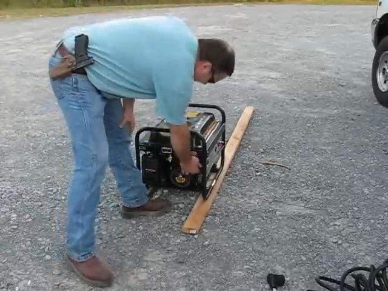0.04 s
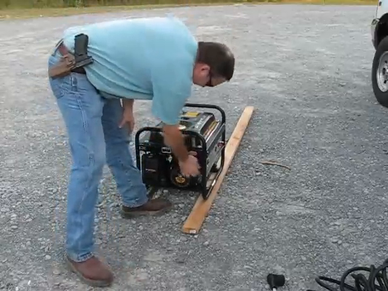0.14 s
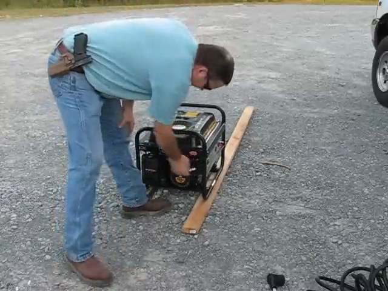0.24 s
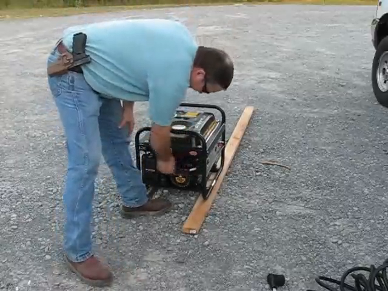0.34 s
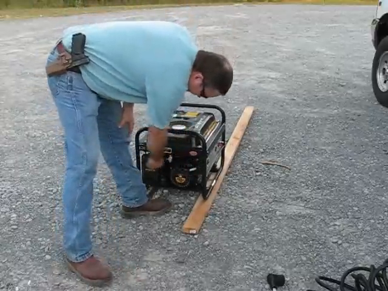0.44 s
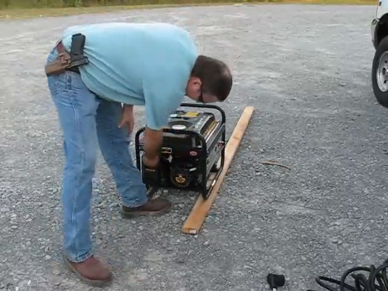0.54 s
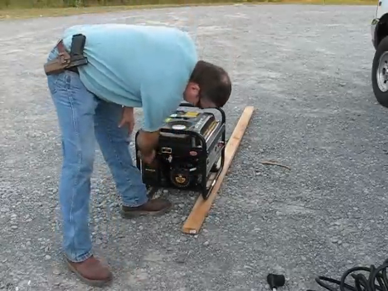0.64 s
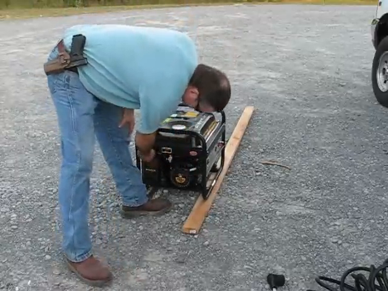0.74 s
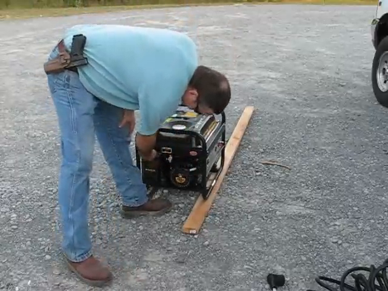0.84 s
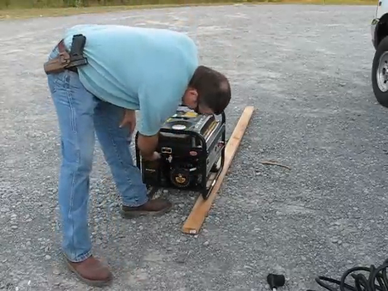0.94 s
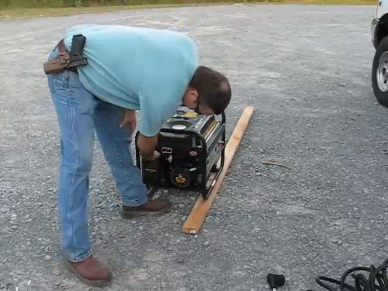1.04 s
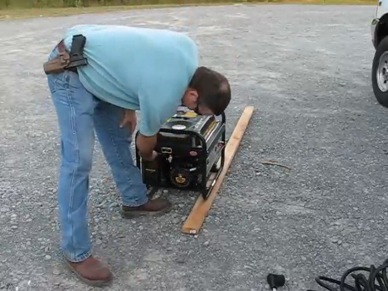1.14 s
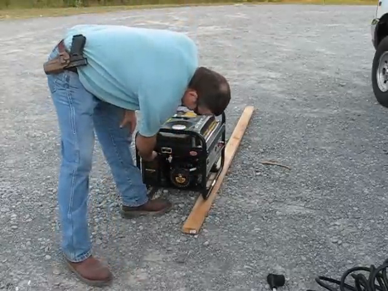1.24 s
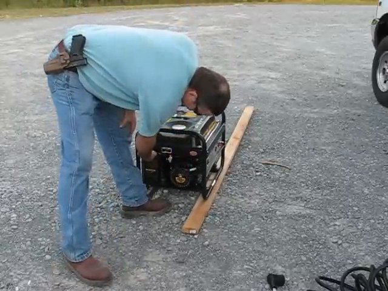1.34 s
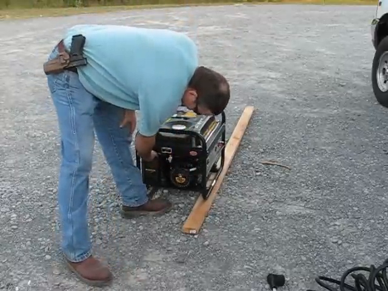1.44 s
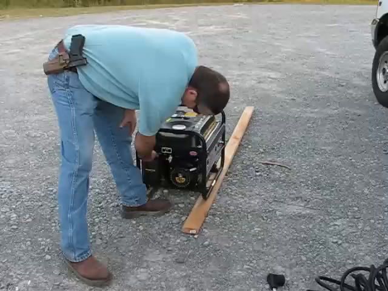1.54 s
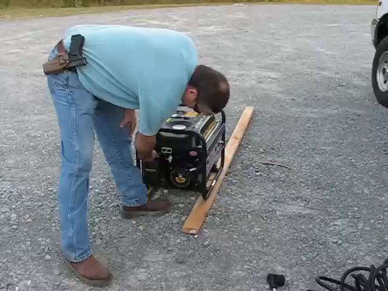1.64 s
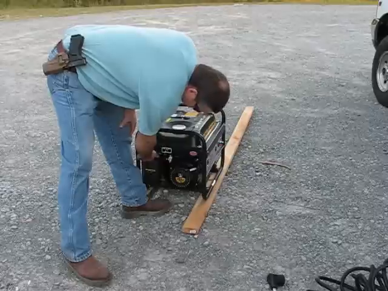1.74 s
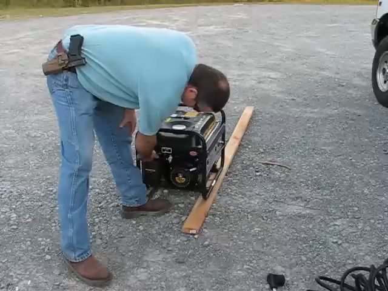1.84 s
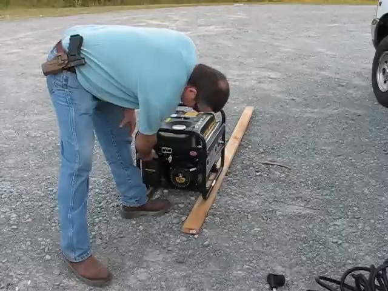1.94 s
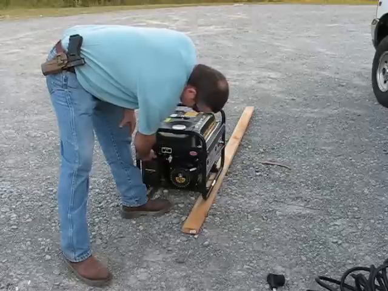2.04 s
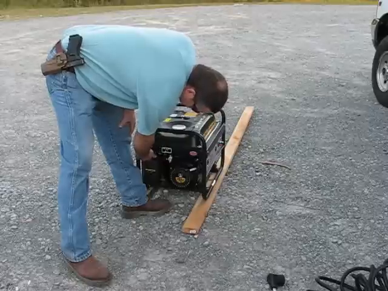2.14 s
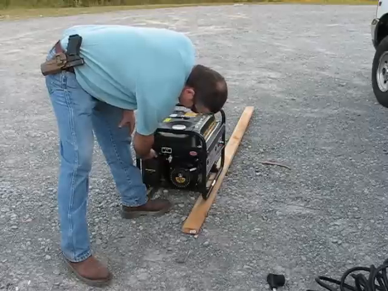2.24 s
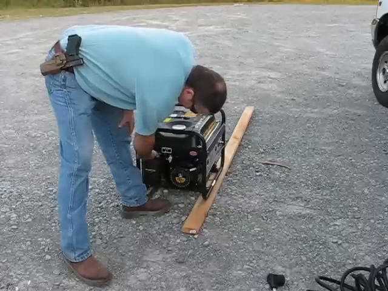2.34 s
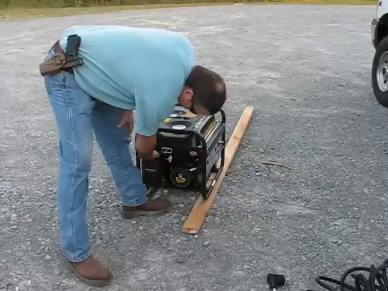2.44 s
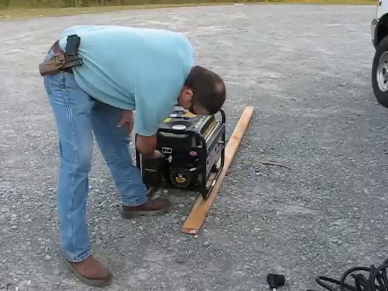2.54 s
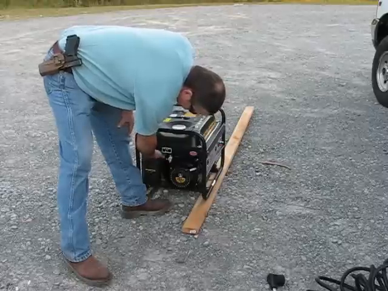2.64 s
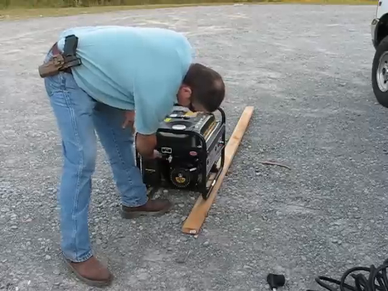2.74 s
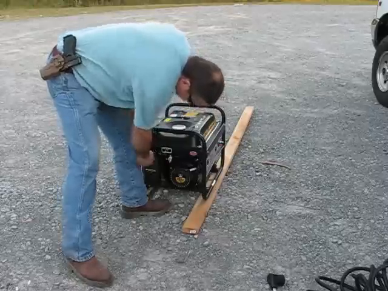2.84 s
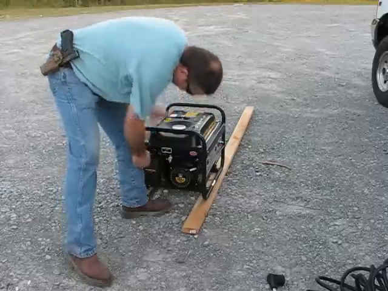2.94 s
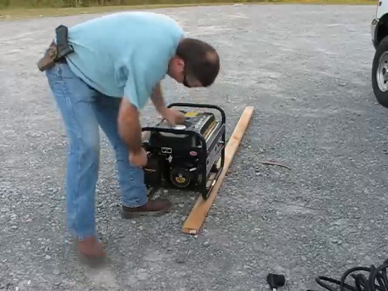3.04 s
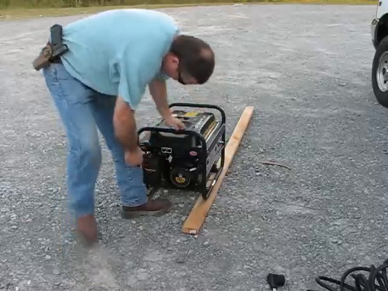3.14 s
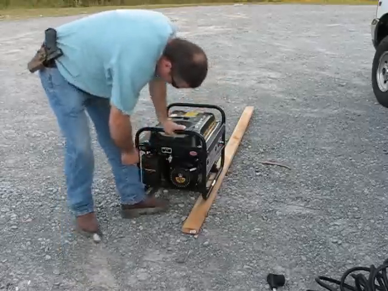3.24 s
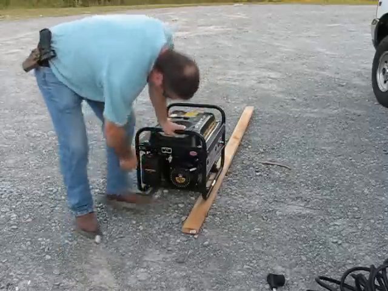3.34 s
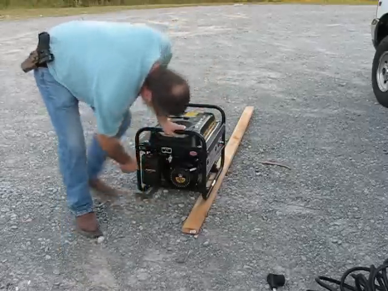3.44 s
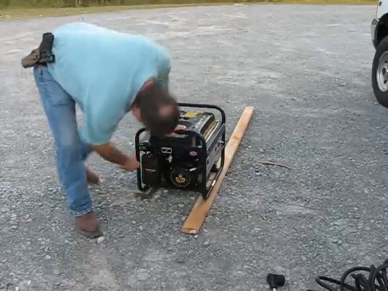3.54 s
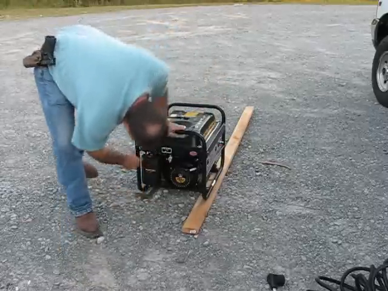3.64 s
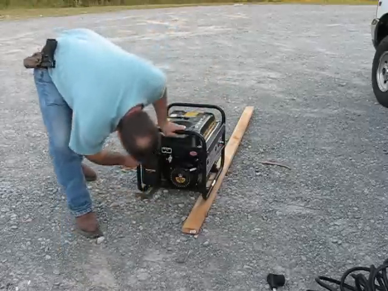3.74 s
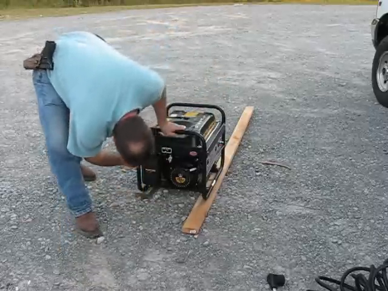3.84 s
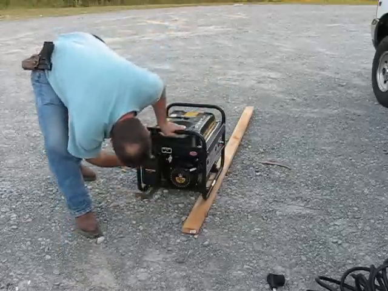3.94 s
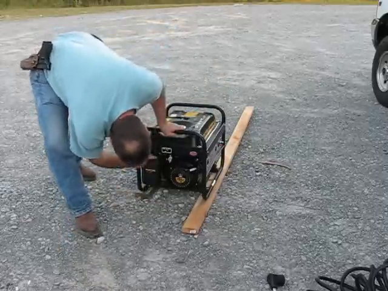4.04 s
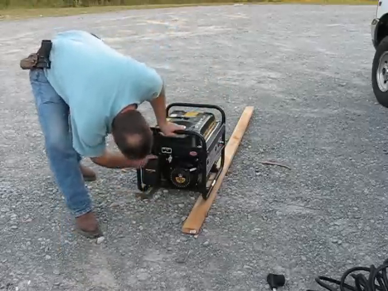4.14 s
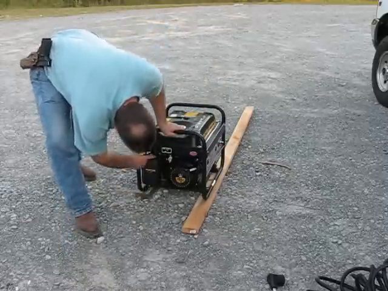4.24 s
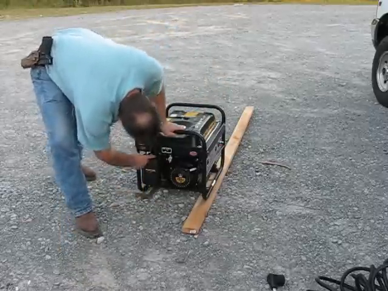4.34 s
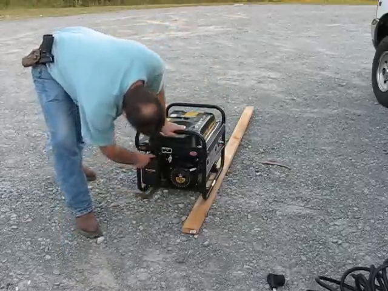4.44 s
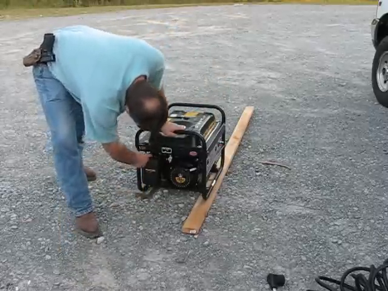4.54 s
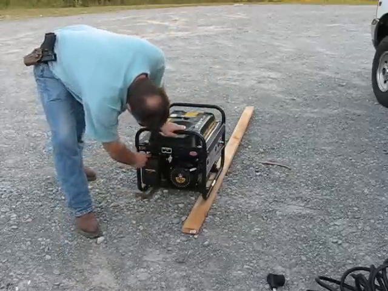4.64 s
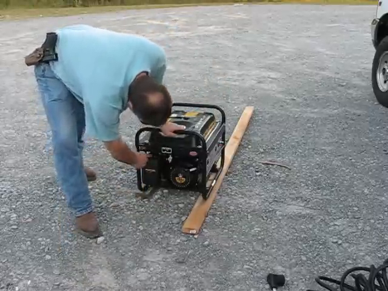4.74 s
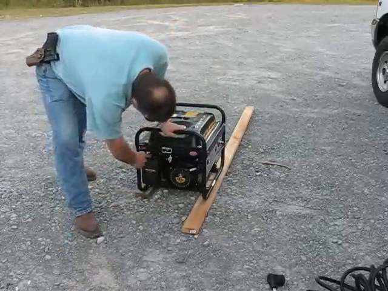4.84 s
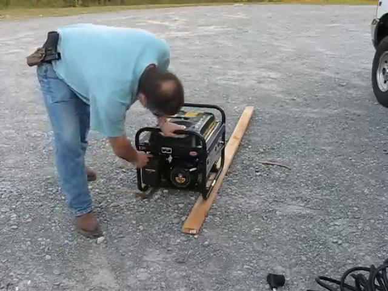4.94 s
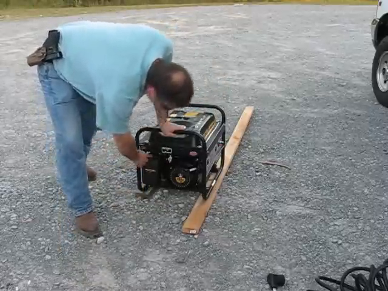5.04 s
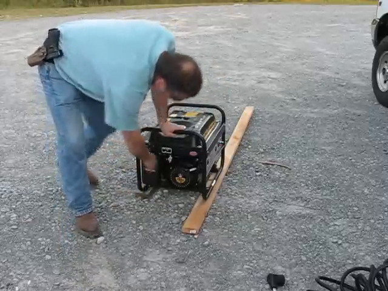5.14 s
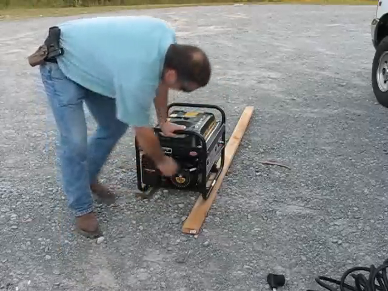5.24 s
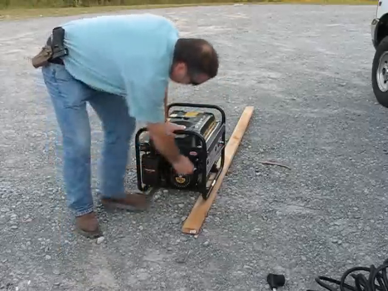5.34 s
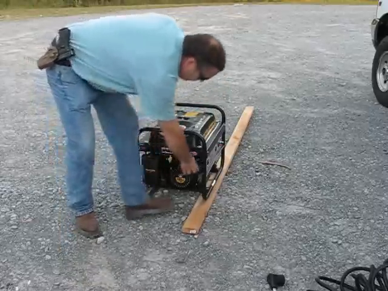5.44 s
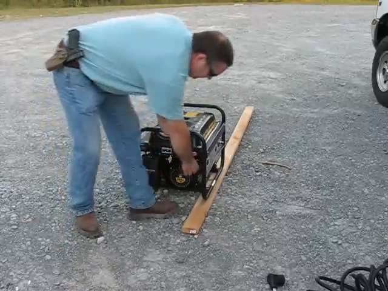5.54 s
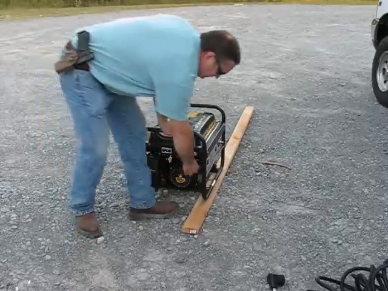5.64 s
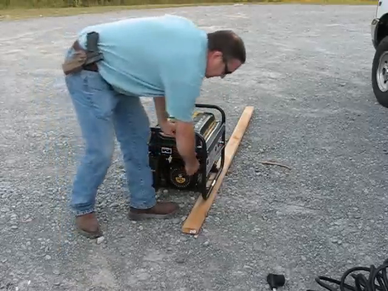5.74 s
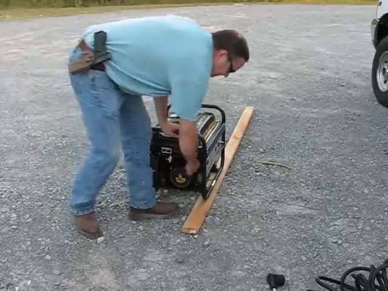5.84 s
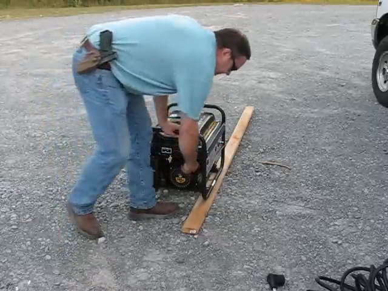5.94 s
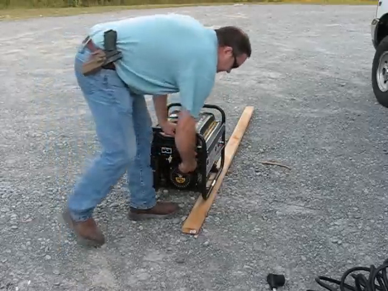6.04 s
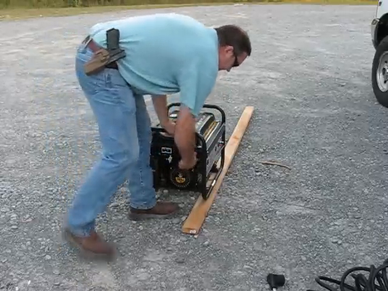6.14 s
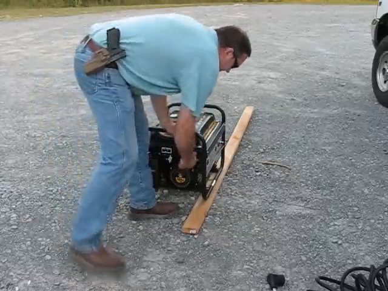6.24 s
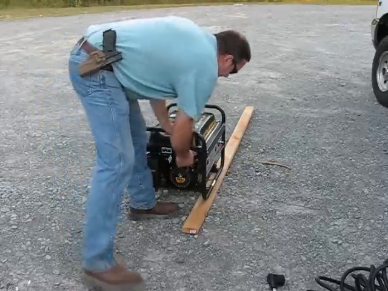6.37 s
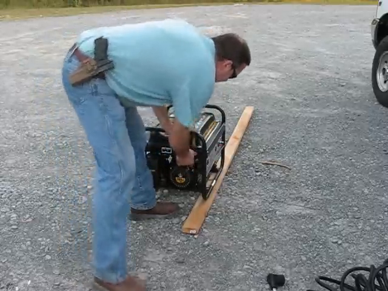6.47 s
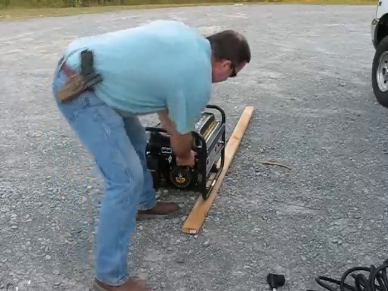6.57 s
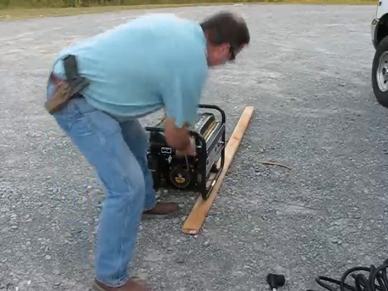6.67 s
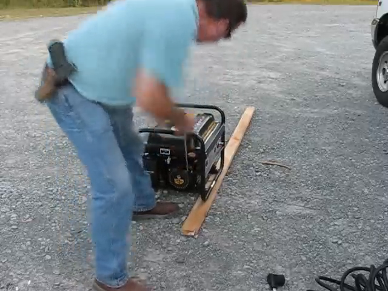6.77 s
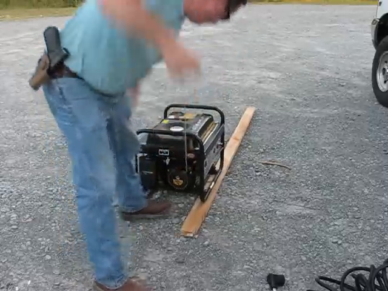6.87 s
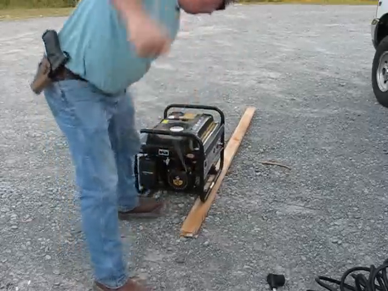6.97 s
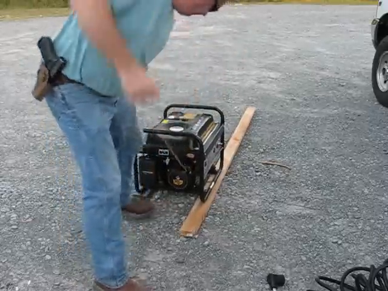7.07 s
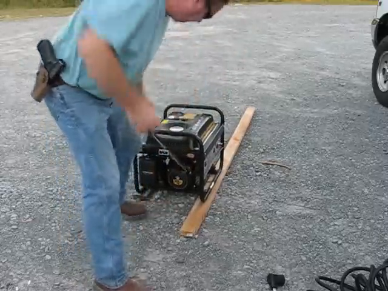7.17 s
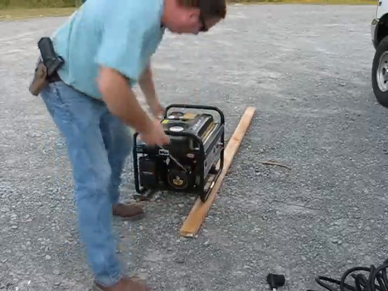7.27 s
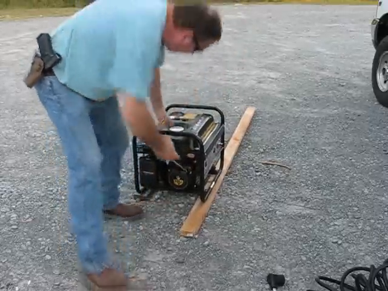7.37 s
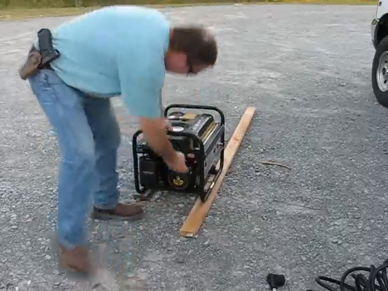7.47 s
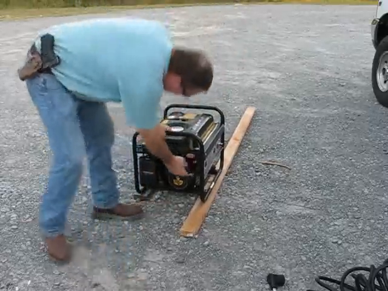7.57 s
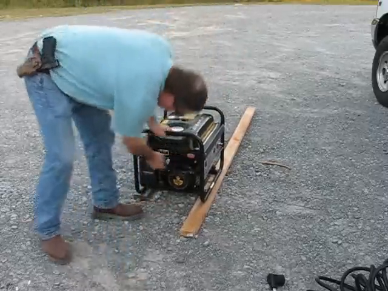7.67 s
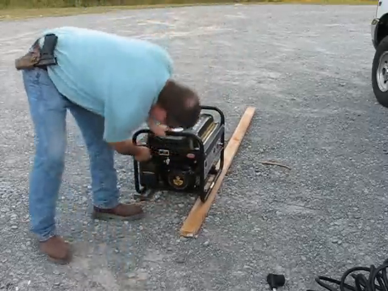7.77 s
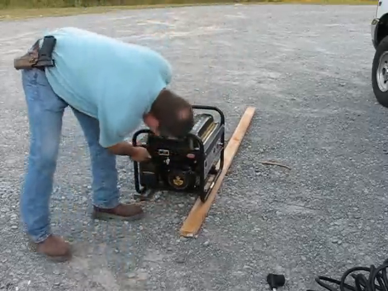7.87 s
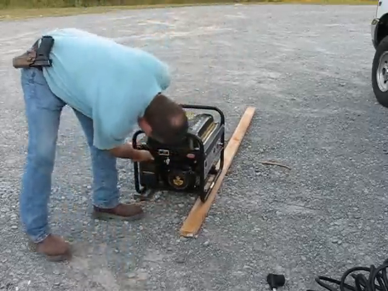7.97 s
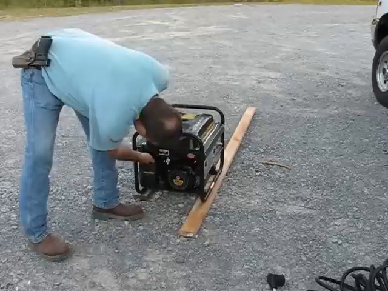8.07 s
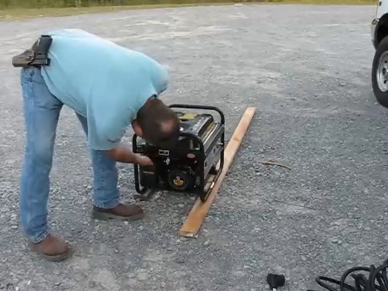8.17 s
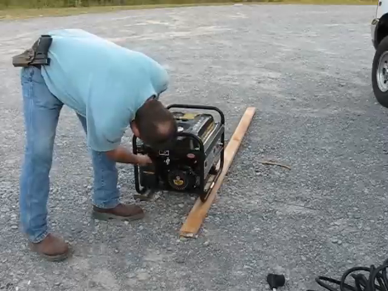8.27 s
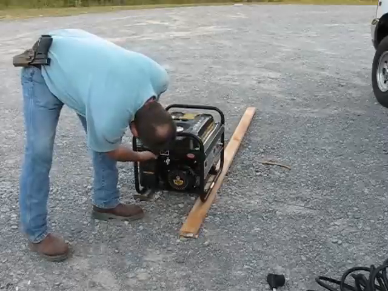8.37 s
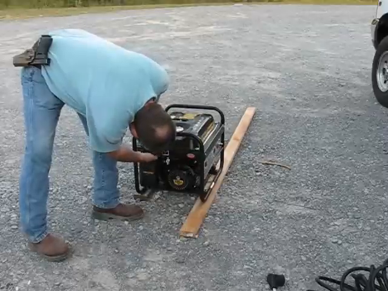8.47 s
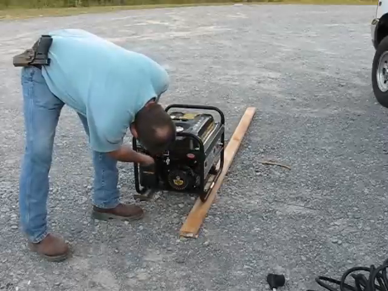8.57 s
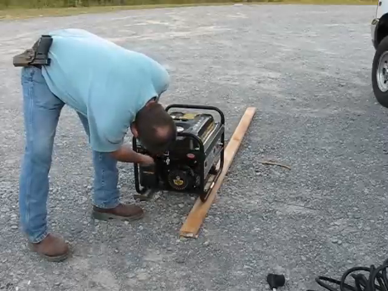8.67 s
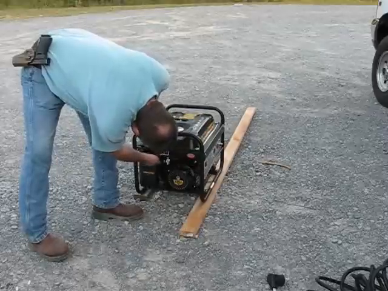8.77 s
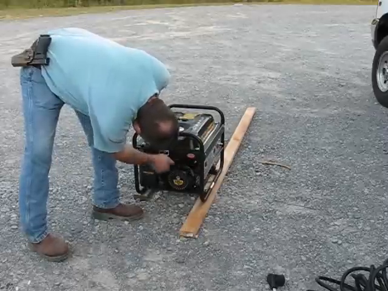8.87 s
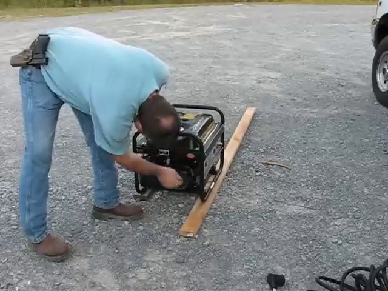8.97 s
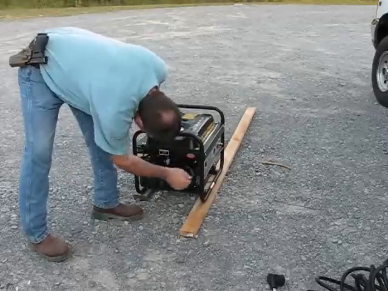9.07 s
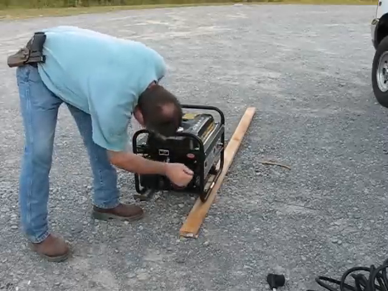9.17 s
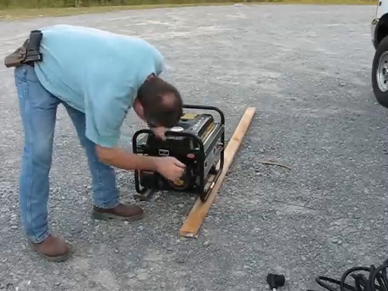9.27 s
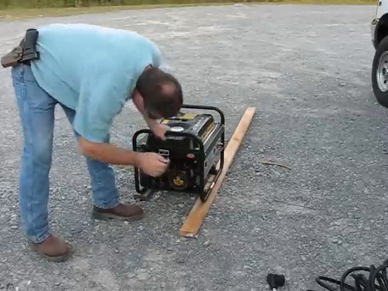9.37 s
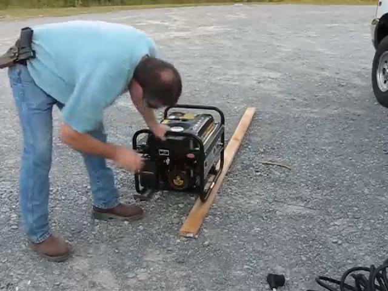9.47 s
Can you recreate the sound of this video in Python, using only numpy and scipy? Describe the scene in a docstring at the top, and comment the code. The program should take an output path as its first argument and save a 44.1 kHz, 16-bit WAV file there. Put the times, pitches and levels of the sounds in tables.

```python
"""A bush cricket rasps in the far outdoor hush, with a low hum and, in spans, a thin high tone.
By a small generator on gravel, boots scuff as shaped noise and levers click as short tones with noise.
Hammer blows ring further off, and one bang, two low pushes with noise, rolls back from the tree line.
The starter cord whirrs as rough noise and its pawl clanks as ringing tones. The choked engine catches:
tones make its thumps and noise its chuffs, weak and late on every second stroke, until it speeds up."""
import sys
import numpy as np
from scipy import signal
from scipy.fft import rfft, irfft, next_fast_len
from scipy.io import wavfile
from scipy.ndimage import uniform_filter1d, map_coordinates

SR = 44100
rng = np.random.default_rng(int(sys.argv[2]) if len(sys.argv) > 2 else 0)


def to_wav(s):
    """Save 16-bit WAV."""
    ch = np.atleast_2d(s).T  # columns
    pcm = np.round(np.clip(ch, -1, 1) * 32767)  # PCM
    wavfile.write(sys.argv[1], SR, pcm.astype(np.int16))


N = 419391  # samples
T = np.arange(N) / SR  # s

# Levels in the tables are relative: a sound may add its own overall gain.
# likeness of left and right, 1 same to -1 opposite, for near sounds: f/Hz, likeness
NEAR_LIKENESS = [(60, 1), (120, 1.0), (240, 0.99), (470, 0.97), (940, 0.93), (1880, 0.94), (3730, 0.5),
                 (7430, 0.61), (14800, 0.045)]
# the same for far sounds: f/Hz, likeness
FAR_LIKENESS = [(60, 0.99), (180, 1), (540, 0.95), (1630, 0.42), (4920, -0.24), (14800, -0.29)]
# the same for the open air around: f/Hz, likeness
OPEN_LIKENESS = [(60, 0.45), (180, 0.93), (540, 0.55), (1630, 0.23), (4920, 0.068), (14800, -1.1)]

# colour of the outdoor hush: f/Hz, level/dB
AIR_COLOUR = [(41, -28), (70, -7.5), (172, -7.5), (237, -6), (297, 0.5), (401, -8), (483, -11), (717, -9.5),
              (802, -6.5), (968, -10.5), (6200, -15), (8060, -47), (13600, -120)]
AIR_DB = -59
# low hum: t/s, f/Hz, level/dB
LOW_HUM = [(0, 57.7, -74), (3.8, 57, -71), (6.7, 56.8, -72)]
# spans of the thin high tone: from t/s, to t/s
WHINE_SPANS = [(0, 3.8), (4.5, 6.7)]
WHINE_HZ, WHINE_WAVER_HZ = 11965, 70

# loudness of the insects: t/s, level/dB
CRICKET_LEVEL = [(0, -49), (2.5, -49), (3.8, -47), (4.2, -50), (5.5, -46.5), (7.05, -47.5), (7.1, -70)]
# colour of the further insects: f/Hz, level/dB
INSECT_BLUR = [(3000, -54), (5800, -39), (6800, -16.5), (7500, -7.0), (8200, -16.5), (8900, -27.5),
               (9400, -40), (12000, -36.5), (13000, -79)]

# bang and first echo: t/s, push level/dB, body level/dB, hiss level/dB, swell over 60 dB/s, t60/s
BANG_BURSTS = [(3.8192, -14, -21.5, -27, 0.02, 0.35), (3.946, -23, -27.5, -21, 0.2353, 0.91)]
# colour of the bang's body: f/Hz, level/dB
BANG_BODY = [(47, -54), (80, -25), (311, -8), (500, -5), (700, -1.5), (900, 0.5), (1230, -3.5),
             (1570, -6.5), (4000, -23), (5200, -24), (8800, -120)]
# colour of the bang's hiss: f/Hz, level/dB
BANG_HISS = [(710, -39), (1200, -4), (1820, 0), (2500, 1.5), (7880, -5.5), (8810, -14.5), (11000, -88),
             (14300, -122), (22000, -120)]
# long echo, body row then hiss row: level/dB, t60/s, late level/dB, late t60/s
LONG_ECHO = [(-27.5, 2.7, -42, 7.7), (-27.5, 1.22, -46, 14)]
ROLL_S, ROLL_HOLD_S = 3.974, 0.24  # the long echo starts, holds, then fades

# hammer blows: t/s, level/dB, boom level/dB, struck note f/Hz
HAMMER_BLOWS = [(3.281, -32.5, -0.5, 910), (3.587, -26.5, -1, 1140), (4.402, -30, 0, 1520),
                (4.736, -26, -0.5, 2090), (5.047, -26, -1, 2100), (5.354, -26, 1, 2034),
                (5.682, -25, -2.5, 2140), (6.008, -23, -0.5, 1540)]
# ringing of the plank: f/Hz, level/dB, t60/s before it is shortened
PLANK_MODES = [(1068, -5, 0.21), (760, -10, .1), (1300, -8, .1), (1540, -1, 0.17), (2000, -0.5, 0.077),
               (2430, -17, 0.33), (3250, -9, 0.16), (4700, -3.5, 0.17), (5070, -11, 0.091)]
# colours of a blow's boom, crack and returning wash: f/Hz, level/dB
BOOM = [(40, -40), (100, -12), (200, -0.5), (310, 4.5), (420, -10), (700, -44), (1500, -70)]
CRACK = [(300, -22), (600, -7.5), (1200, 3.0), (2500, 2.0), (6000, -4.5), (9000, -6.5), (10000, -56)]
WASH = [(2000, -40), (2300, 0), (2500, 0), (2800, -40)]
WASH_DB = -25  # next to the blow
STRUCK_DB, STRUCK_T60_S = -1, 0.06  # the struck note of a blow is strong and short

# boot scuffs, and the short noisy burst of the hammer blow at 3.28 s: peak t/s, level/dB, rise over 20 dB/s,
# fall over 20 dB/s
SCUFF_BURSTS = [(0.02, -50, 0.12, 0.089), (0.085, -43, 0.052, 0.11), (0.22, -52, .15, 0.18),
                (2.472, -46.5, .015, 0.1), (2.81, -45.5, 0.017, 0.28), (2.932, -50.5, .02, 0.23),
                (3.06, -56, 0.038, 0.056), (3.24, -52.5, 0.095, 0.16), (3.285, -27.5, .003, 0.037),
                (3.333, -41, 0.03, 0.11), (3.385, -41.5, 0.0055, .06), (3.62, -45, 0.072, 0.058),
                (3.702, -47, .08, 0.41), (5.575, -40.5, 0.13, 0.16), (5.624, -43.5, 0.046, 0.036),
                (5.79, -44.5, 0.13, 0.26), (6.19, -36, 0.17, .05), (6.222, -35.5, 0.02, 0.025),
                (6.304, -33, 0.068, 0.019), (6.34, -56, .03, 0.4), (6.488, -53, .01, 0.063)]
# colour of grinding gravel: f/Hz, level/dB
GRAVEL_COLOUR = [(88, -34), (150, -8.5), (825, -2), (1600, -2), (3710, -5), (5160, -7.5), (7870, -4),
                 (9280, -20), (12000, -25), (15600, -62), (22000, -120)]
# clicks of stones and levers: t/s, level/dB, f/Hz, hollow knock level/dB, t60/s
STONE_CLICKS = [(0.044, -31, 1500, -27, 0.043), (0.075, -25.5, 1460, -32, 0.065),
                (0.103, -30, 1340, -17, 0.067), (0.215, -38.5, 1000, -14, 0.076),
                (0.389, -36.5, 1260, -22, 0.013), (0.704, -27.5, 2570, 0, 0.032),
                (0.82, -33.5, 880, -7, 0.037), (2.805, -38, 1480, -26, .04), (2.829, -35, 1390, -22, .025),
                (2.854, -25.5, 1050, -29, 0.013), (2.909, -38, 2510, -15.5, .02),
                (2.925, -26, 900, -33, 0.017), (2.947, -33, 1150, -26, .015),
                (2.977, -29, 2000, -32, 0.014), (3.047, -34, 900, -14, 0.013),
                (3.141, -33, 6300, -25, 0.009), (3.169, -38, 1540, -0.5, 0.063),
                (3.283, -22, 800, -20, 0.021), (3.295, -21.5, 700, -20, 0.025),
                (3.334, -21, 1620, -15, .015), (3.362, -17, 1600, -21, 0.012),
                (3.382, -22.5, 1100, -30, 0.014), (3.398, -28, 2000, -16, .012),
                (3.417, -28.5, 6150, -16, 0.027), (3.439, -33, 5630, -21, .015),
                (3.462, -23, 6640, -43, 0.0087), (3.465, -23, 6640, -40, 0.018),
                (3.484, -33, 5500, -25, .012), (3.493, -32, 6390, -28, .018),
                (3.522, -25.5, 5000, -40, 0.011), (3.554, -26.5, 6130, -21, .022),
                (5.598, -28, 910, -8, 0.017), (5.626, -21.5, 800, -14, 0.015),
                (5.751, -27, 1030, -18, 0.011), (6.19, -21, 1590, -35, .03), (6.219, -26, 2930, -17, .02),
                (6.2952, -19, 6700, -21, 0.014), (6.3061, -21, 2600, -28, 0.0083),
                (6.386, -34.5, 1200, -25, .012), (6.303, -29, 2590, -31, .017),
                (6.332, -31, 3740, -21, .019), (6.4155, -27, 5000, -22, 0.013),
                (6.489, -29, 1920, -29, .016), (6.578, -22, 1220, -13, 0.048),
                (6.5977, -15, 2430, -28, 0.012), (6.6016, -20, 2430, -30, .02),
                (6.6267, -24.5, 1630, -13, 0.014), (6.694, -19.5, 1760, -27, 0.013),
                (6.7081, -17, 3140, -32, .01), (6.715, -22.5, 6500, -31, .02),
                (6.743, -22, 2490, -25, .029)]
# brighter clicks fizz more: click f/Hz, fizz level/dB
CLICK_FIZZ = [(800, -37), (2500, -21), (5000, -13), (6700, -17)]
# dull body knocks: t/s, level/dB, f/Hz, t60/s
DULL_KNOCKS = [(3.281, -28, 470, 0.044), (3.294, -28, 510, .035), (3.333, -34, 258, .06),
               (3.306, -33, 750, .03), (3.318, -32, 520, .04), (3.334, -31, 900, .03),
               (3.348, -32, 500, .04), (3.363, -25, 402, 0.052), (3.382, -32, 560, .03),
               (3.418, -44, 400, 0.039), (6.232, -32.5, 480, .04), (6.575, -38, 160, 0.047),
               (6.779, -35, 148, 0.046), (8.928, -14.5, 325, 0.12)]
# fine hissing grit: peak t/s, level/dB, rise over 20 dB/s, fall over 20 dB/s
GRIT_SPRAY = (3.52, -52, .1, .08)
# treble loss of knocks: f/Hz, level/dB
TREBLE_LOSS = [(10000, 0), (12500, -5), (14000, -20), (16000, -45)]
# colours of a click's crunch and fizz, and of the grit: f/Hz, level/dB
CRUNCH = [(200, -30), (450, 3.5), (800, -5.5), (7000, 2), (9000, -2.0), (10000, -55)]
FIZZ_COLOUR = [(6000, -31), (8500, -21), (13000, 1), (15000, -31)]
GRIT_COLOUR = [(8000, -38), (10500, 5), (13000, 3), (15300, -12)]
CLICK_LEFT_DB, SNAP = -2.5, 1.86  # left over right; size of the first contact in a click

# pull of the starter cord: t/s, whirr level/dB, chug level above it/dB
CORD_PULL = [(6.55, -61, -22), (6.575, -61, -1), (6.594, -35.5, -1.5), (6.662, -46.5, -14),
             (6.758, -37, -15), (6.8, -28.5, -9), (6.826, -26.5, -9), (6.86, -30.5, -5), (6.92, -24.5, -13),
             (6.945, -26, -11), (6.98, -26.5, -8.5), (7.03, -28.5, -12.5), (7.1, -47, -20)]
# colour of the whirr: f/Hz, level/dB
WHIRR_COLOUR = [(180, -36), (300, -17), (535, -7), (762, -7), (1070, -3), (2130, -4.5), (7360, -8),
                (11700, -26.5), (12900, -37), (14000, -101)]
# resonances of the starter housing: f/Hz, width/Hz, level/dB
HOUSING_MODES = [(546, 27, -1), (848, 45, 7), (1100, 43, -12), (2540, 25, 9)]
# the ratchet catches or rattles loose and rings the housing: t/s, level/dB, f/Hz, swell/s
RATCHET_CATCHES = [(6.787, -36, 1510, .004), (6.812, -22.5, 850, 0.0087), (6.878, -21, 520, 0.0083),
                   (6.91, -19, 1110, 0.0072), (6.972, -25, 1540, 0.0055)]
# ringing of the pawl and loose metal: f/Hz, level/dB, t60/s
PAWL_MODES = [(2745, -26, .9), (5030, -26, .8), (5085, -25, .8), (7354, -6, .17), (7444, -4, .19),
              (7501, -6, .17), (9135, -6, .07), (10630, -28, .08), (12180, -28, .06)]
# metal blows: the starter pawl, then loose parts once the engine runs: t/s, level/dB, ring level/dB, ring
# tilt/dB per octave
METAL_BLOWS = [(7.031, -3, -12, -2), (7.034, -0.5, -21, 2), (7.0491, -9, 8, 4), (7.1066, -18.5, 3.5, -24),
               (7.178, -27, 0, -19), (7.203, -16.5, -14, -9), (7.224, -12, -15, -10), (7.3182, -11, -12, 0),
               (7.3324, -9.5, -13, 0), (7.379, -10.5, -12, 5), (8.9155, -10, -16, 0)]
TILT_MOST_DB = 11  # a tilted blow lifts no mode by more
# colours of the engine's chug under the cord and of a pawl's crash: f/Hz, level/dB
CHUG = [(40, -14), (115, 2.5), (300, 2), (600, 0), (1500, -62)]
CRASH = [(600, -32), (1400, 0.5), (2900, -2.5), (4000, 1.0), (8500, -3.0), (10500, -12.5), (14000, -18)]

# pace of the engine: t/s, exhaust strokes per second
STROKE_RATE = [(7.15, 14.55), (7.35, 17.96), (7.55, 22.81), (7.8, 25.19), (8.1, 24.1), (8.5, 22.88),
               (8.85, 23.13), (9.0, 25.44), (9.2, 29.1), (9.33, 30.5), (9.51, 31.05)]
# loudness of the engine's parts: t/s, rattle level/dB, thump level/dB, chuff level/dB
ENGINE_LEVELS = [(7.06, -39.5, -46, -28), (7.27, -28.5, -40, -28), (7.34, -23, -27.5, -11.5),
                 (7.5, -21, -25.5, -10), (8.2, -23.5, -28, -9), (9.05, -22, -26, -8.5),
                 (9.2, -21, -26, -12.5), (9.51, -19.5, -28, -19.5)]
# span in which every second stroke misfires: from t/s, to t/s
CHOKED_SPAN = (7.6, 9.02)
THUMP_LOST = 0.22  # share of its push that a misfired stroke loses
MISS_DB, MISS_LATE_S = -16, 0.012  # a misfired chuff is weak and late
# choked until, revving from, revving to, open from: t/s
CHOKE_TIMES = (8.98, 9.18, 9.33, 9.42)
# muffler tones while choked: f/Hz, level/dB
MUFFLER_CHOKED = [(23, -34), (50, -11), (90, -6.5), (120, -2), (148, 0), (165, -6.5), (186, 5), (225, -1),
                  (258, -20), (300, 5.5), (335, -2.5), (375, -17), (420, -6), (520, -14)]
# muffler tones while the engine gathers speed: f/Hz, level/dB
MUFFLER_REVVING = [(23, -36), (60, -14), (90, -9), (118, -6), (148, 0.5), (178, 3), (207, -3), (238, -16),
                   (265, -6), (292, 3), (322, -3), (350, 3), (385, -12), (440, -10), (472, 0), (530, -12)]
# muffler tones with the choke open: f/Hz, level/dB
MUFFLER_AT_SPEED = [(23, -32), (60, -18), (95, -15), (122, -7), (150, 5), (182, 0), (212, -1), (242, -30),
                    (275, -1), (300, 0.5), (350, 4), (390, -25), (450, -16), (487, 6.5), (530, -16)]
REV_DB = 1  # the pops swell as the engine gathers speed
# muffler chambers that ring on after each pop: f/Hz, width/Hz
CHAMBERS = [(120, 40), (186, 30), (300, 30)]
# colour of the rattle's hiss: f/Hz, level/dB
RATTLE_COLOUR = [(250, -23), (420, -2.5), (520, 0), (775, -7), (1010, -1), (1640, -1), (5300, -8),
                 (7400, -7.5), (9100, -15), (10200, -25.5), (12000, -19), (13300, -40), (15000, -89)]
HISS_LOST = 0.19  # share of that hiss that fades as the choke opens
# panels that the choked engine shakes: f/Hz, width/Hz, level/dB
PANELS_CHOKED = [(1680, 220, 5), (2426, 45, 7.5), (3300, 30, 5.5), (4160, 280, 0)]
# panels that buzz at speed: f/Hz, width/Hz, level/dB
PANELS_AT_SPEED = [(1200, 41, 1.5), (1630, 150, -3.5), (2465, 42, 1), (2880, 43, 1.5), (3240, 69, -5),
                   (3520, 55, -5), (3940, 100, -4.5)]
# colour of the exhaust gas: f/Hz, level/dB
CHUFF_COLOUR = [(400, -58), (800, -11), (1500, -1.5), (2200, -0.5), (3000, 0), (4200, 0.5), (5600, -3),
                (7200, 5), (8600, -1), (10000, -14.5), (12000, -7.5), (15000, -37)]
CHUFF_SCATTER_DB = 1.4  # most that a chuff strays, up or down
SWELL_S, SWELL_SCATTER = 0.011, 0.3  # a chuff swells, some slower than others
# a panel rings out on one stroke: t/s, level/dB, f/Hz, swell/s
PANEL_RINGS = [(7.316, -17, 3100, 0.0018), (7.338, -17, 7320, 0.0052), (7.38, -13.5, 2780, 0.0033),
               (7.54, -23, 4000, .005), (7.58, -24, 6600, 0.0044), (7.672, -27, 6420, .005),
               (7.832, -17, 7300, 0.0075), (7.908, -14.5, 6900, 0.0064), (8.072, -19.5, 7600, 0.0064),
               (8.154, -18, 4190, 0.0044), (8.243, -18, 4130, .004), (8.326, -16.5, 7260, 0.0068),
               (8.415, -31, 7400, .005), (8.497, -17.5, 6920, 0.0038), (8.585, -16, 1900, 0.0056),
               (8.667, -15, 1605, 0.0075), (8.758, -14.5, 7600, 0.0037), (8.845, -19, 6460, 0.0038),
               (8.917, -9.5, 3060, 0.0028), (8.93, -15, 1800, 0.0013), (8.935, -17, 3990, 0.0044),
               (9.0, -17.5, 3200, .005), (9.088, -19, 4550, 0.0036), (9.195, -21, 6580, .005),
               (9.228, -21, 3300, .004), (9.262, -19, 3310, .005), (9.393, -23, 6460, .006),
               (9.428, -23.5, 1510, .008), (9.445, -23, 2690, 0.0055)]
# colours of the engine's rumble and of the knocks that shake the panels: f/Hz, level/dB
RUMBLE = [(30, -27), (60, -5), (150, -2.5), (190, -5), (260, 5.0), (310, 7.0), (500, -5.5),
          (900, -43), (2000, -80)]
KNOCKS = [(600, -36), (1200, 0.0), (6000, -1.5), (9500, -40)]
CLATTER_PER_S, CLATTER_DB, CLATTER_HZ = 300, -8.5, 2395  # loose parts tick at random around this pitch
# balance of the engine: f/Hz, left over right level/dB
ENGINE_BALANCE = [(300, 0), (1400, -.5), (2400, -3), (4400, -1), (8000, -2), (14000, 5)]
TOP_HZ = 15300  # nothing sounds above it


def amp(db):
    """Turn decibels into a plain factor."""
    return 10 ** (np.asarray(db) / 20)


def unit(x):
    """Scale a sound to rms 1."""
    return x / np.sqrt(np.mean(x ** 2) + 1e-20)


def along(points, hz):
    """Read (f/Hz, value) points on a log axis."""
    f, value = np.transpose(points)
    return np.interp(np.log(hz + 1), np.log(f + 1), value)


def curves(rows):
    """Give one value per sample for each column after the time."""
    s, *columns = np.transpose(rows)
    return [np.interp(T, s, column) for column in columns]


def during(rows):
    """Give 1 while a table lasts, with 10 ms edges."""
    return np.clip(np.minimum(T - rows[0][0], rows[-1][0] - T) * 100 + 1, 0, 1)


def wobble(rate):
    """Draw a smooth random curve with rate knots a second."""
    return map_coordinates(rng.standard_normal(int(N * rate / SR) + 4), [T * rate])


def filtered(x, response):
    """Multiply the spectrum of x by a response, which may be complex."""
    m = next_fast_len(N + SR // 2)
    return irfft(rfft(x, m) * response(np.fft.rfftfreq(m, 1 / SR)), m)[..., :N]


def resonant(modes):
    """Build the response of things that ring only after they are shaken, signs alternating."""
    def response(f):
        return sum((-1) ** k * amp(db) * 1j * f * w / (c * c - f * f + 1j * f * w)
                   for k, (c, w, db) in enumerate(modes))
    return response


def rush(spectrum, alike, grit_db=0):
    """Make coloured stereo noise of rms 1; grit scatters the size of its samples into grains."""
    pair = rng.standard_normal((2, N)) * amp(grit_db * wobble(1500))

    def split(hz):
        angle = np.arccos(np.clip(along(alike, hz), -1, 1)) / 2
        return amp(along(spectrum, hz)) * [np.cos(angle), np.sin(angle)]
    mid, side = filtered(pair, split)
    return unit(np.array([mid + side, mid - side]))


def add(track, s, sound):
    """Mix a sound in at second s."""
    part = track[..., round(s * SR):][..., :sound.shape[-1]]
    part += sound[..., :part.shape[-1]]


def swell_and_fade(t, swell):
    """Rise to 1 at time swell, then die away."""
    return t / swell * np.exp(1 - t / swell)


def scuff_level(db, s, rise, fall):
    """Rise to a peak in dB at second s and fall again, in straight dB lines."""
    return db - 20 * np.maximum((s - T) / rise, (T - s) / fall)


def ring(modes, t, stretch, flicker_db):
    """Let struck modes fade; the level of each flickers at random."""
    knots = np.arange(0, t[-1] + 0.02, 0.008)
    out = 0
    for hz, db, t60 in modes:
        flicker = np.interp(t, knots, flicker_db * rng.standard_normal(len(knots)))
        level = amp(db + flicker - 60 * t / (stretch * t60))
        out = out + level * np.sin(2 * np.pi * hz * t + rng.uniform(0, 5.6))
    return out


def ping(hz, swell, t):
    """Ring briefly and roughly: a narrow band of noise around a tone, swelling and dying."""
    b, a = signal.iirpeak(hz, 9, SR)
    band = unit(signal.lfilter(b, a, rng.standard_normal((2, len(t)))))
    tone = np.sin(2 * np.pi * hz * t)
    return swell_and_fade(t, swell) * (0.6 * tone + 0.4 * band[0] + 0.25 * band)


def air():
    """Far outdoor hush as soft noise, a low hum and a thin wavering tone."""
    out = amp(AIR_DB + 0.12 * wobble(0.53)) * rush(AIR_COLOUR, OPEN_LIKENESS)
    hz, db = curves(LOW_HUM)
    hum = np.sin(2 * np.pi * np.cumsum(hz) / SR)
    out = out + during(LOW_HUM) * amp(db + 1.0 + 1.9 * wobble(4.6)) * hum
    pitch = WHINE_HZ + WHINE_WAVER_HZ * wobble(3.4)
    whine = np.sin(2 * np.pi * np.cumsum(pitch) / SR) * amp([[2.5], [-2.5]])  # louder on the left
    for start, end in WHINE_SPANS:
        out = out + during([(start,), (end,)]) * amp(-72.5 + 3.4 * wobble(53)) * whine
    return out


def cricket():
    """Wing strokes about 48 a second, each a short falling chirp, over a blur of further insects."""
    beat = np.cumsum(47.8 + 3 * wobble(20) + 0.6 * wobble(0.7)) / SR
    t = beat % 1 / 48  # time within a wing stroke
    size = amp(1.3 * rng.standard_normal(600)[beat.astype(int)])
    swell = swell_and_fade(t, 0.0025) ** 1.6 * amp(1.6 * wobble(600))
    pitch = 8000 - 1000 * (1 - np.exp(-t / 0.0061))
    chirp = unit(size * swell * np.sin(2 * np.pi * np.cumsum(pitch) / SR))
    blur = amp(2.3 * wobble(150)) * rush(INSECT_BLUR, OPEN_LIKENESS)
    late = np.roll(chirp, 4)  # the right side is 4 samples late and upside down
    return amp(curves(CRICKET_LEVEL)[0]) * unit(np.array([chirp, -late]) + blur)


def bang():
    """Two low pressure pushes with bursts of noise, then a wide echo whose treble dies first."""
    after = np.maximum(T - ROLL_S - ROLL_HOLD_S, 0)
    body_power, hiss_power = [
        (T > ROLL_S) * (amp(db - 60 * after / t60) ** 2 + amp(late_db - 60 * after / late_t60) ** 2)
        for db, t60, late_db, late_t60 in LONG_ECHO]
    out, t = np.zeros((2, N)), np.arange(SR // 8) / SR
    for s, db, body_db, hiss_db, swell, t60 in BANG_BURSTS:
        burst = amp(-60 * np.maximum((s - T) / swell, (T - s) / t60))
        body_power = body_power + (amp(body_db) * burst) ** 2
        hiss_power = hiss_power + (amp(hiss_db) * burst) ** 2
        # the push starts with a quick slide in phase
        snap = amp(-60 * t / 0.046) * np.sin(2 * np.pi * 190 * t + 3 * (1 - np.exp(-t / 0.00056)))
        low = amp(-13.0 - 60 * t / 0.12) * np.sin(2 * np.pi * 105 * t)
        add(out, s, -amp(db) * (snap + low))
    body = np.sqrt(body_power) * amp(0.8 * wobble(30)) * rush(BANG_BODY, FAR_LIKENESS, grit_db=1.4)
    hiss = np.sqrt(hiss_power) * rush(BANG_HISS, FAR_LIKENESS, grit_db=1.2)
    return out + body + hiss


def hammer():
    """A plank rings briefly with a crack and a boom; each blow comes back as a faint narrow wash."""
    out, t = np.zeros((2, N)), np.arange(SR // 3) / SR
    boom_noise, crack_noise = rush(BOOM, NEAR_LIKENESS), rush(CRACK, NEAR_LIKENESS)
    wash_noise = rush(WASH, FAR_LIKENESS)
    for s, db, boom_db, hz in HAMMER_BLOWS:
        span = slice(round(s * SR), round(s * SR) + len(t))
        boom = boom_noise[:, span] * amp(boom_db - 60 * t / 0.28) * (1 - np.exp(-t / 0.014))
        crack = amp(-60 * t / 0.16) * (1 - np.exp(-t / 0.0007)) * crack_noise[:, span]
        plank = ring(PLANK_MODES, t, stretch=0.6, flicker_db=4.0)
        struck = [(hz, STRUCK_DB, STRUCK_T60_S), (hz * 0.94, STRUCK_DB - 4, STRUCK_T60_S)]
        note = ring(struck, t, stretch=1, flicker_db=0.5)
        add(out, s, amp(db - 4.5) * (0.5 * plank + note + 0.87 * crack + boom))
        wash = (t / 0.065 * np.exp(1 - t / 0.057)) ** 2 * wash_noise[:, span]
        add(out, s + 0.05, amp(db + WASH_DB) * wash)
    return filtered(out, lambda hz: amp(2 * along(TREBLE_LOSS, hz)))


def gravel():
    """Boots grind dense grains; single stones and levers click, some with a hollow knock."""
    scuffs = sum(amp(scuff_level(db, s, rise, fall)) for s, db, rise, fall in SCUFF_BURSTS)
    out = scuffs * amp(2.7 * wobble(60)) * rush(GRAVEL_COLOUR, NEAR_LIKENESS, grit_db=1.5)
    t = np.arange(SR // 2) / SR
    tube = amp(-61.5 - 60 * t / 6.0) * np.sin(2 * np.pi * 2771 * t) * np.sqrt(1 - 2 * t)
    add(out, 0.1, tube)  # a frame tube rings on faintly
    t = np.arange(SR // 8) / SR
    crunch = rush(CRUNCH, NEAR_LIKENESS)[0]
    fizz = rush(FIZZ_COLOUR, NEAR_LIKENESS)[0]
    sides = amp([[CLICK_LEFT_DB / 2], [-CLICK_LEFT_DB / 2]])
    for s, db, hz, knock_db, t60 in STONE_CLICKS:
        span = slice(round(s * SR), round(s * SR) + len(t))
        b, a = signal.iirpeak(hz, 2.5, SR)
        tone = unit(signal.lfilter(b, a, crunch[span]))
        snap = SNAP * np.sin(2 * np.pi * hz * t) * np.exp(-2 * hz * t)  # first contact
        rough = tone + 0.35 * crunch[span] + amp(along(CLICK_FIZZ, hz)) * fizz[span]
        tick = snap + rough * amp(-60 * t / t60)
        knock = amp(knock_db + 6.0 - 60 * t / 0.079) * np.sin(2 * np.pi * 340 * t)
        knock = knock * (1 - np.exp(-t / 0.002))
        add(out, s, amp(db - 7.0) * (tick * sides + knock))
    for s, db, hz, t60 in DULL_KNOCKS:
        add(out, s, amp(db - 60 * t / t60) * np.sin(2 * np.pi * hz * t) * (1 - np.exp(-t / 0.001)))
    s, db, rise, fall = GRIT_SPRAY
    spray = amp(scuff_level(db, s, rise, fall) + 3.5 * wobble(90))
    spray = spray * rush(GRIT_COLOUR, NEAR_LIKENESS, grit_db=6)
    return filtered(out, lambda hz: amp(along(TREBLE_LOSS, hz))) + spray


def starter():
    """The cord whirrs off its reel and turns the engine over; the pawl snaps back and rings, and loose metal
    clanks and rings once the engine runs."""
    whirr_db, chug_db = curves(CORD_PULL)
    teeth = 1 + 0.12 * np.cos(2 * np.pi * np.cumsum(110 + 25 * wobble(10)) / SR)  # the ratchet chatters
    whirr = rush(WHIRR_COLOUR, NEAR_LIKENESS, grit_db=2.0)
    housing = unit(filtered(whirr, resonant(HOUSING_MODES)))
    whirr = teeth * amp(1.5 * wobble(70)) * unit(whirr + amp(-7.0) * housing)
    chug = amp(chug_db) * rush(CHUG, NEAR_LIKENESS)
    out = during(CORD_PULL) * amp(whirr_db) * (whirr + chug)
    t = np.arange(SR // 3) / SR
    crash_noise = rush(CRASH, NEAR_LIKENESS)
    for s, db, hz, swell in RATCHET_CATCHES:
        b, a = signal.iirpeak(hz, 12, SR)
        scrape = whirr[:, round(s * SR):][:, :len(t)]
        rasp = 0.69 * unit(signal.lfilter(b, a, scrape)) + 0.62 * scrape
        add(out, s, amp(db - 7.5) * swell_and_fade(t, swell) * rasp)
    for s, db, ring_db, tilt_db in METAL_BLOWS:
        modes = [(hz, level + min(tilt_db * np.log2(hz / PAWL_MODES[4][0]), TILT_MOST_DB), t60)
                 for hz, level, t60 in PAWL_MODES]
        crash = amp(-60 * t / 0.07) * crash_noise[:, round(s * SR):][:, :len(t)]
        clang = amp(ring_db) * ring(modes, t, stretch=1, flicker_db=5) * np.sqrt(1 - 3 * t)
        add(out, s, amp(db - 9.5) * (crash + clang))
    return out


def clatter():
    """Random ticks of loose metal, rms 1 over the time the engine runs."""
    when, pitch, size, side = rng.uniform(0, 1, (900, 4)).T
    start = ENGINE_LEVELS[0][0] + np.cumsum(-np.log(when)) / CLATTER_PER_S
    pitches = CLATTER_HZ * 2 ** (3 * pitch - 1.5)
    t, out = np.arange(SR // 100) / SR, np.zeros((2, N))
    for s, hz, loud, pan in zip(start, pitches, size, side):
        tick = amp(12 * loud - 60 * t / 0.008) * np.sin(2 * np.pi * hz * t)
        add(out, s, tick * amp([[6 * pan - 3], [3 - 6 * pan]]))
    return unit(out) * np.sqrt(np.mean(during(ENGINE_LEVELS)))


def engine_thump(speed, strokes, missed, opened, thump_db):
    """Each stroke pops in the muffler: tones at multiples of the stroke rate over a rumble."""
    stroke = (strokes + 0.3).astype(int)
    fired = 1 - THUMP_LOST * missed
    push = uniform_filter1d(fired * amp(0.8 * rng.standard_normal(80)[stroke]), size=300)
    sway = 0.002 * wobble(20)
    settled = np.interp(T, CHOKE_TIMES, [0, 0, 0, 1])

    def colour(hz):
        choked = (1 - opened) * along(MUFFLER_CHOKED, hz)
        revving = (opened - settled) * (along(MUFFLER_REVVING, hz) + REV_DB)
        return choked + revving + settled * along(MUFFLER_AT_SPEED, hz)

    def lag(hz):
        return sum(np.arctan2(hz * w, c * c - hz * hz) for c, w in CHAMBERS)

    # tones line up into one pop a stroke that rings on in the chambers, the lowest ones ahead and adrift
    tones = 0
    for k in range(1, 23):
        level = amp(colour(k * speed) + 1.5 * wobble(6))
        phase = 2 * np.pi * k * (strokes - 0.16 + sway) - lag(k * speed)
        drift = 3 / k + (0.25 + 1.5 / k) * wobble(4)
        tones = tones + level * np.cos(phase + drift)
    running = T >= STROKE_RATE[0][0]
    tones = tones * running
    pops = unit(push * tones) * np.sqrt(np.mean(running))
    return amp(thump_db) * (pops + 0.4 * rush(RUMBLE, NEAR_LIKENESS))


def engine_rattle(strokes, opened, rattle_db):
    """The strokes shake the frame: hiss, buzzing panels and ticks of loose parts."""
    knocks = amp(3.9 * wobble(250)) * rush(KNOCKS, NEAR_LIKENESS)
    choked_buzz = 0.5 * unit(filtered(knocks, resonant(PANELS_CHOKED)))
    open_buzz = amp(-4.5) * unit(filtered(knocks, resonant(PANELS_AT_SPEED)))
    panels = (1 - opened) * choked_buzz + opened * open_buzz
    shake = 1 + 0.097 * np.cos(2 * np.pi * (strokes - 0.05))
    hiss = (1 - HISS_LOST * opened) * rush(RATTLE_COLOUR, NEAR_LIKENESS, grit_db=1.5)
    parts = hiss + panels + amp(CLATTER_DB) * clatter()
    return amp(rattle_db + 1.06 * wobble(25)) * shake * parts


def engine():
    """Each stroke thumps the muffler, chuffs out gas and shakes the frame."""
    speed = curves(STROKE_RATE)[0]
    strokes = np.cumsum(speed * (T >= STROKE_RATE[0][0])) / SR + 0.92  # running count
    every_second = (strokes + 0.3).astype(int) % 2 == 0
    missed = (T > CHOKED_SPAN[0]) & (T < CHOKED_SPAN[1]) & every_second
    opened = np.interp(T, CHOKE_TIMES, [0, 1, 1, 1])
    rattle_db, thump_db, chuff_db = curves(ENGINE_LEVELS)
    thump = engine_thump(speed, strokes, missed, opened, thump_db)
    sound = during(ENGINE_LEVELS) * (engine_rattle(strokes, opened, rattle_db) + thump)
    gas, t = rush(CHUFF_COLOUR, NEAR_LIKENESS, grit_db=1.5), np.arange(SR // 12) / SR
    starts = np.flatnonzero(np.diff(strokes.astype(int)))
    for i, (size, slow) in zip(starts, rng.uniform(-1, 1, (80, 2))):
        swell = SWELL_S * (1 + SWELL_SCATTER * slow)
        puff = swell_and_fade(t, swell) ** 1.72  # gas bursts out and thins
        s = i / SR + MISS_LATE_S * missed[i]
        db = chuff_db[i] + MISS_DB * missed[i] + CHUFF_SCATTER_DB * size
        jet = gas[:, round(s * SR):][:, :len(t)]
        add(sound, s + 0.005 - swell, amp(db - 8.5) * puff[:jet.shape[1]] * jet)
    for s, db, hz, swell in PANEL_RINGS:
        add(sound, s, amp(db) * ping(hz, swell, t))
    return filtered(sound, lambda hz: amp(along(ENGINE_BALANCE, hz) * np.array([[0.5], [-0.5]])))


def scene():
    """Add up all sources, from the background to the engine."""
    return air() + cricket() + bang() + hammer() + gravel() + starter() + engine()


def record(dry):
    """Round off the loudest peaks and keep nothing above the band limit."""
    wet = dry / (1 + np.abs(dry / 1.05) ** 6) ** (1 / 6)
    return filtered(wet, lambda hz: hz < TOP_HZ)


dry = scene()
out = record(dry)
to_wav(out)
```